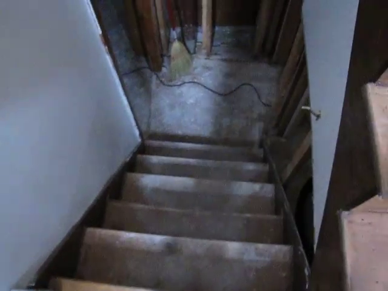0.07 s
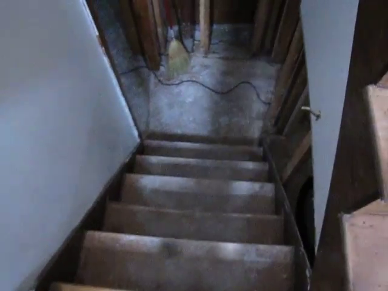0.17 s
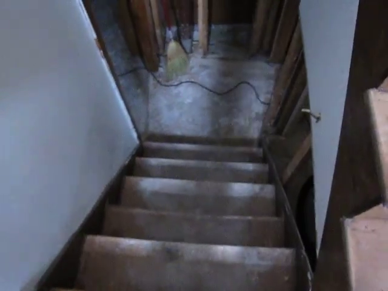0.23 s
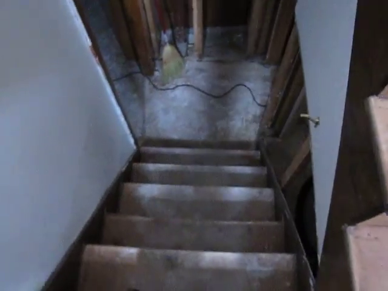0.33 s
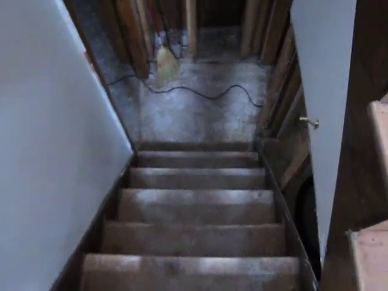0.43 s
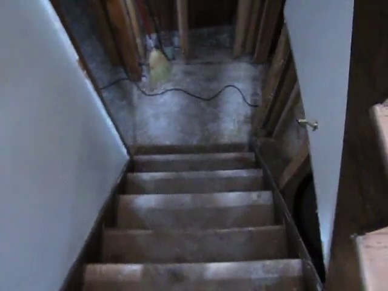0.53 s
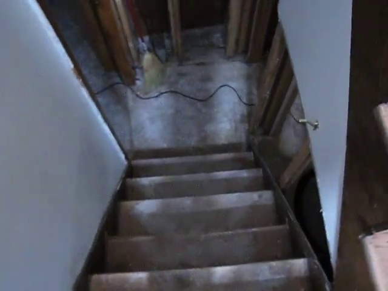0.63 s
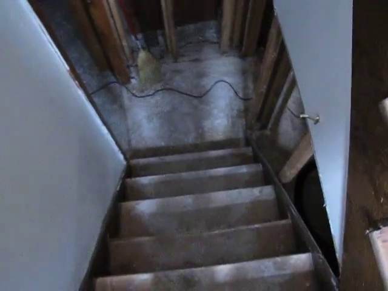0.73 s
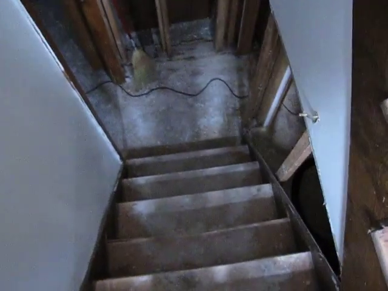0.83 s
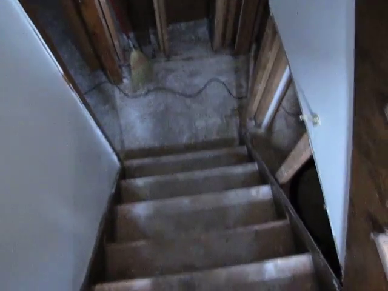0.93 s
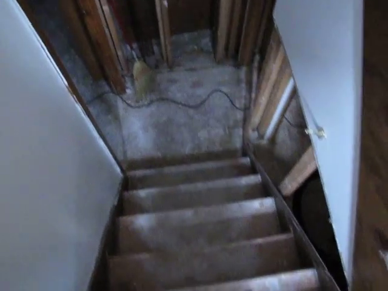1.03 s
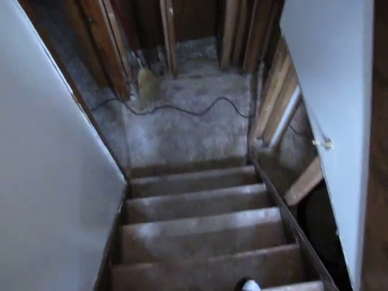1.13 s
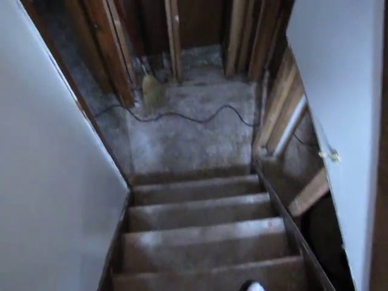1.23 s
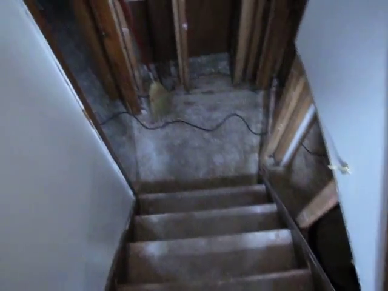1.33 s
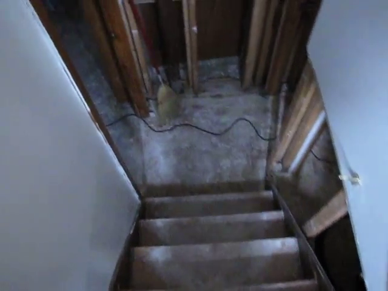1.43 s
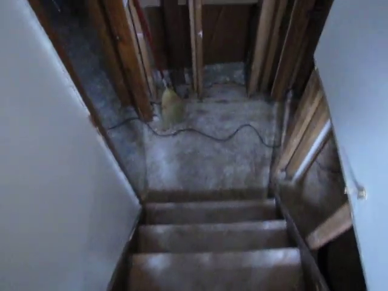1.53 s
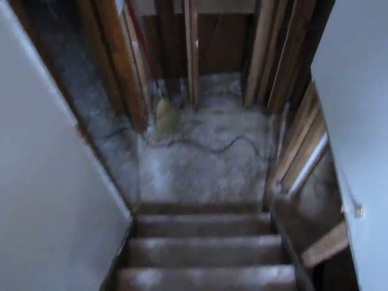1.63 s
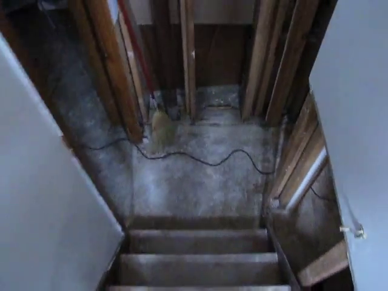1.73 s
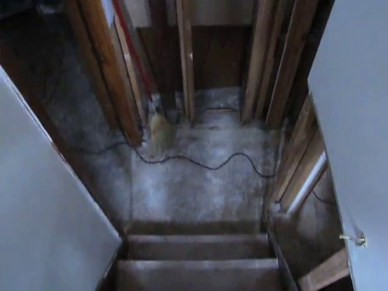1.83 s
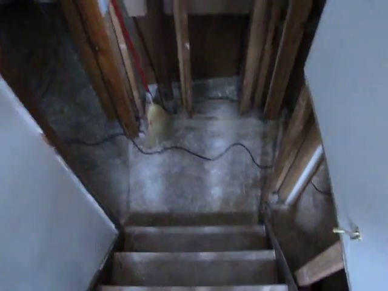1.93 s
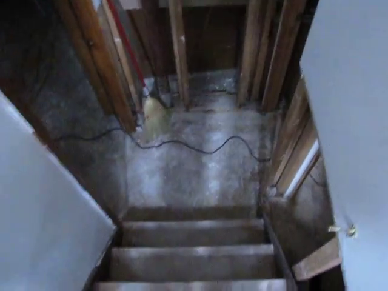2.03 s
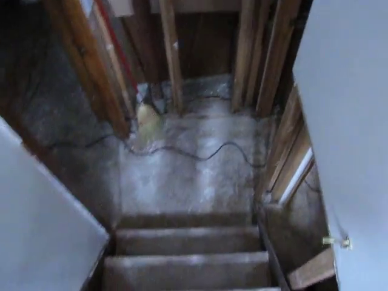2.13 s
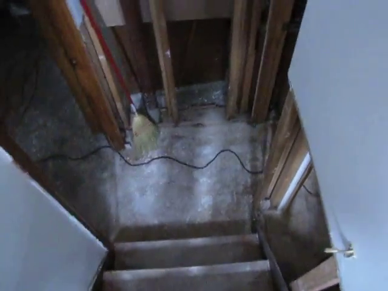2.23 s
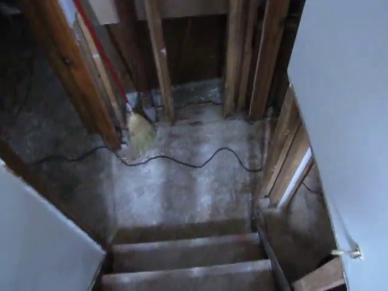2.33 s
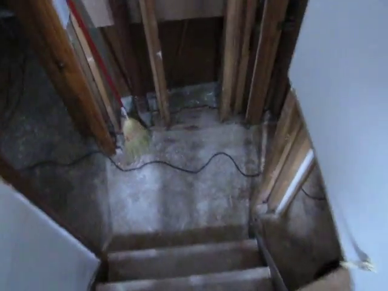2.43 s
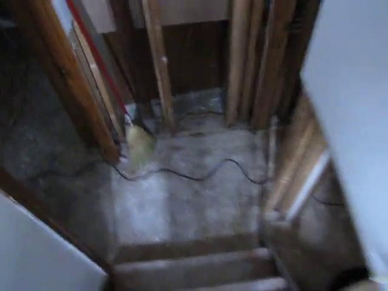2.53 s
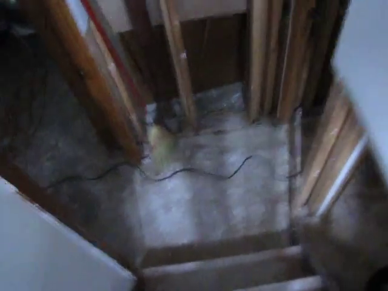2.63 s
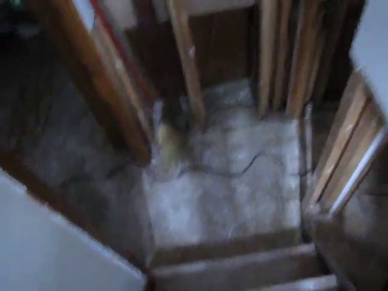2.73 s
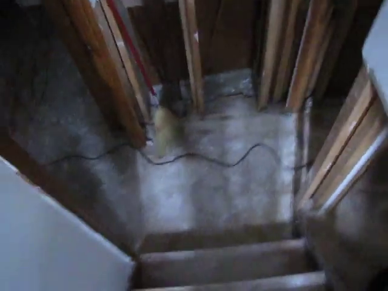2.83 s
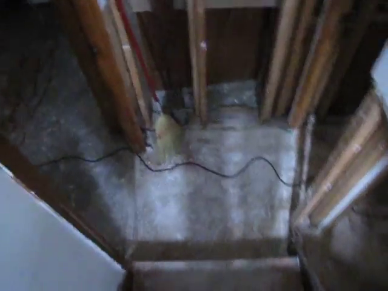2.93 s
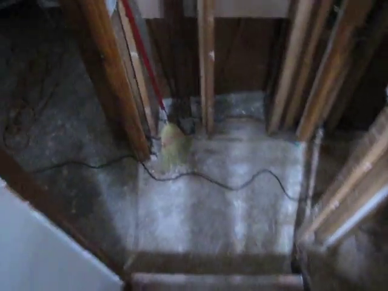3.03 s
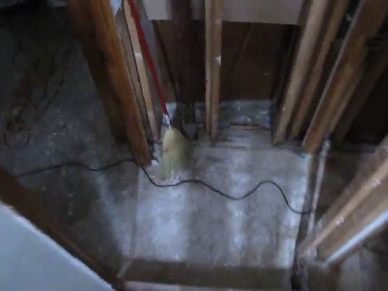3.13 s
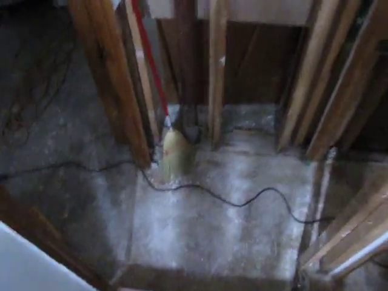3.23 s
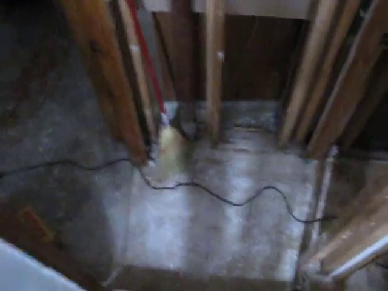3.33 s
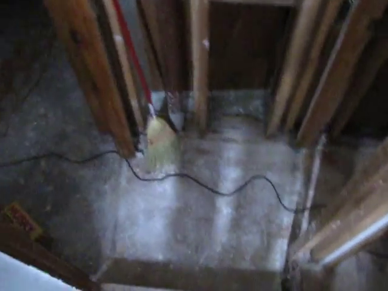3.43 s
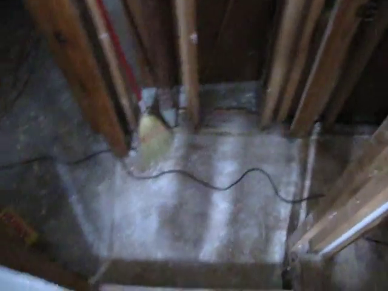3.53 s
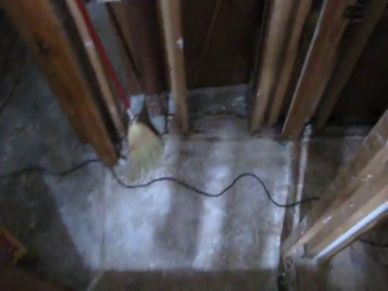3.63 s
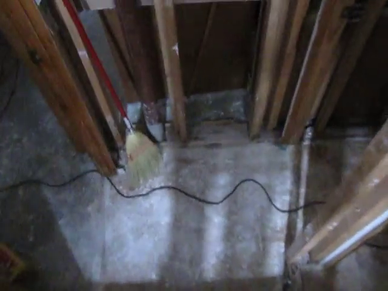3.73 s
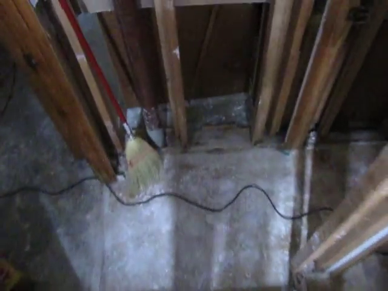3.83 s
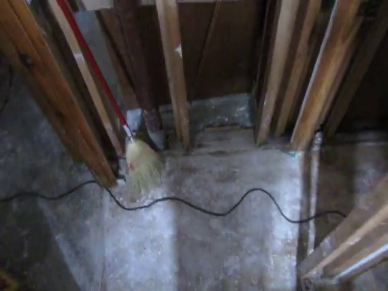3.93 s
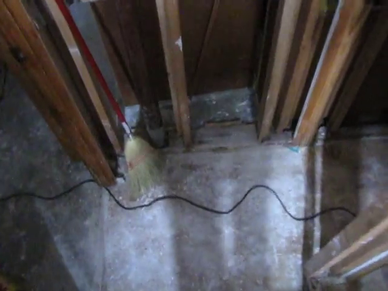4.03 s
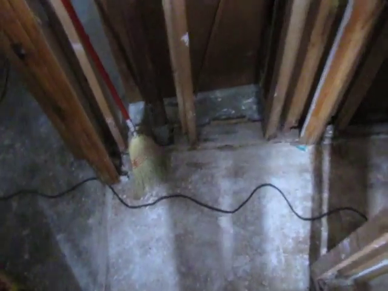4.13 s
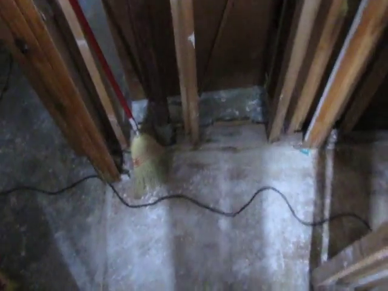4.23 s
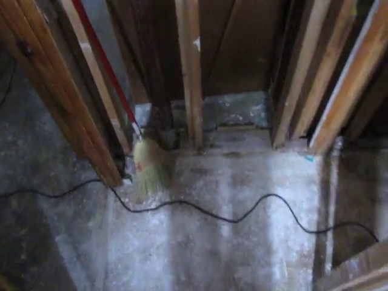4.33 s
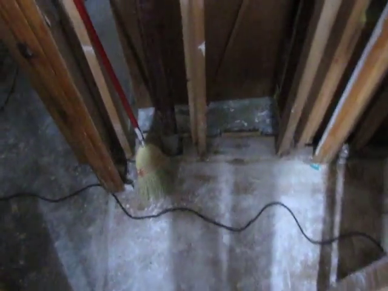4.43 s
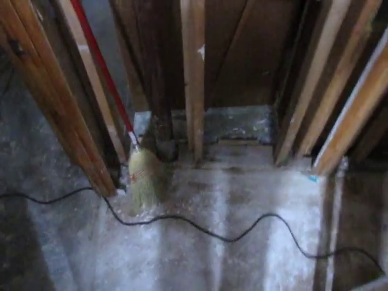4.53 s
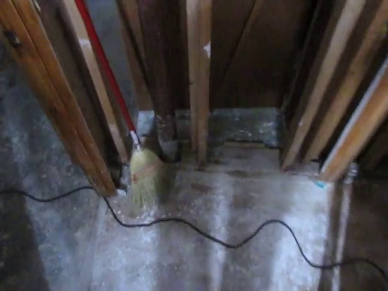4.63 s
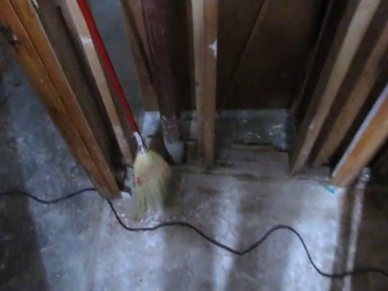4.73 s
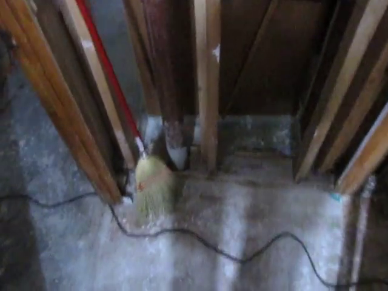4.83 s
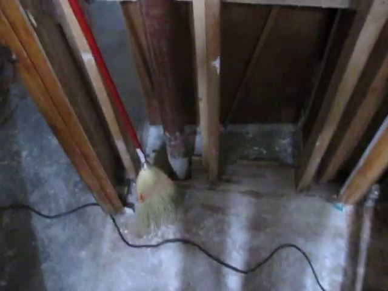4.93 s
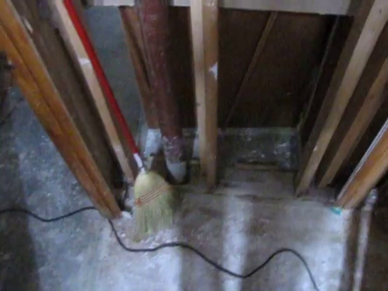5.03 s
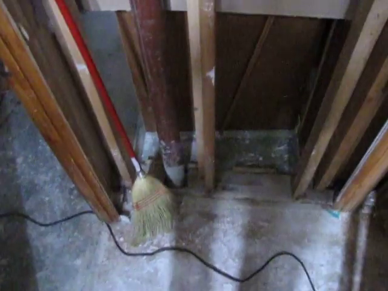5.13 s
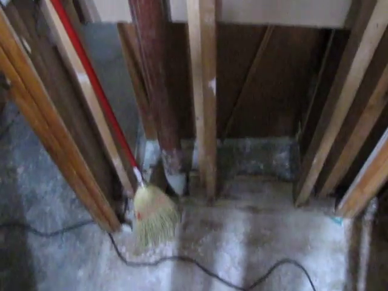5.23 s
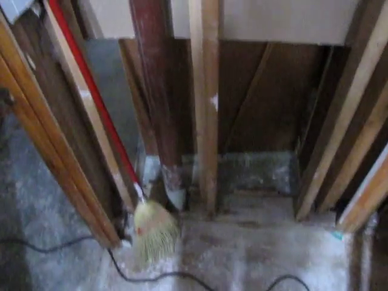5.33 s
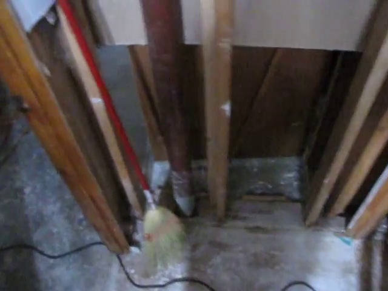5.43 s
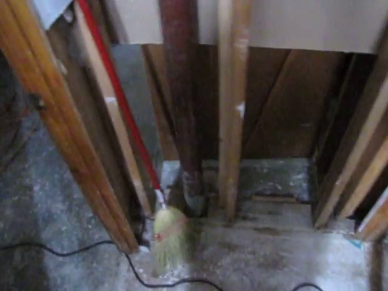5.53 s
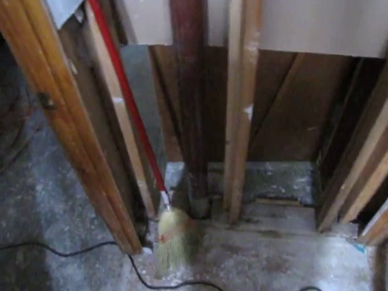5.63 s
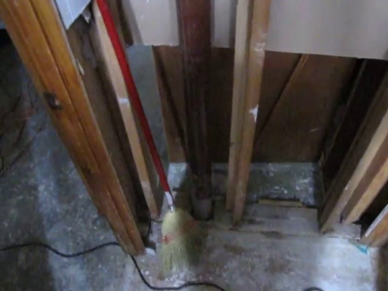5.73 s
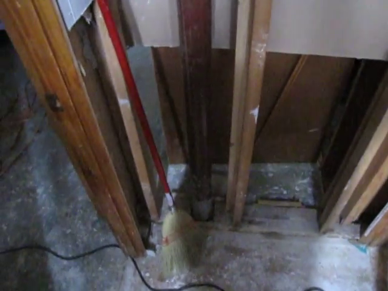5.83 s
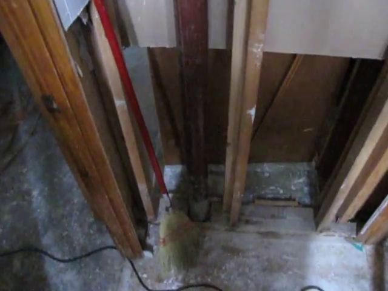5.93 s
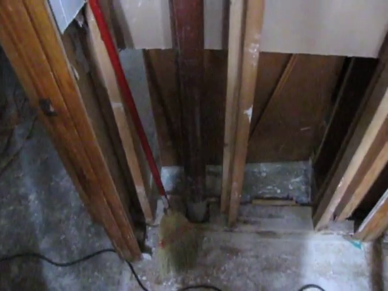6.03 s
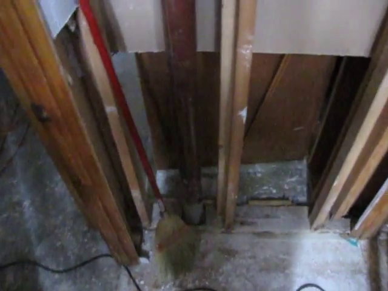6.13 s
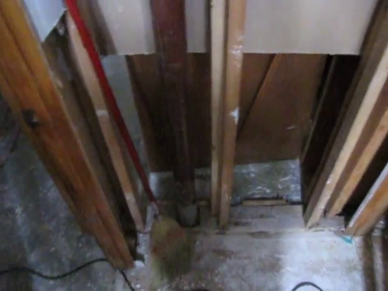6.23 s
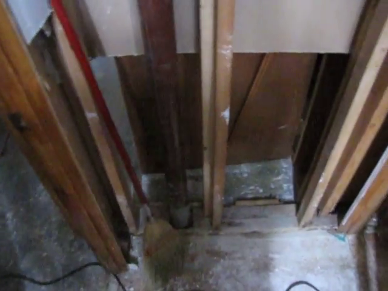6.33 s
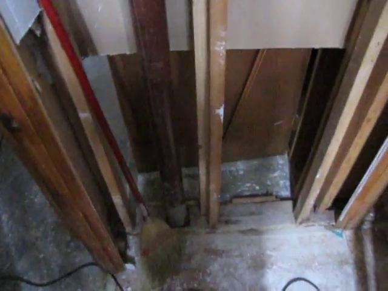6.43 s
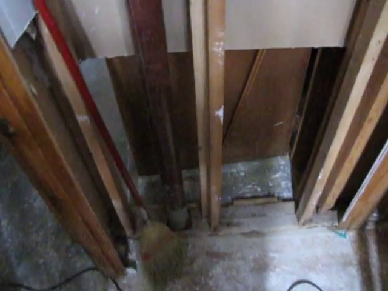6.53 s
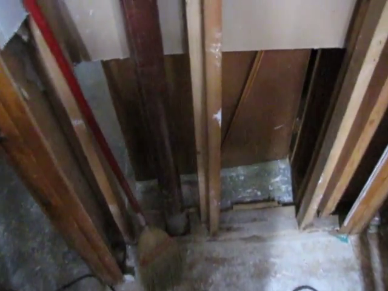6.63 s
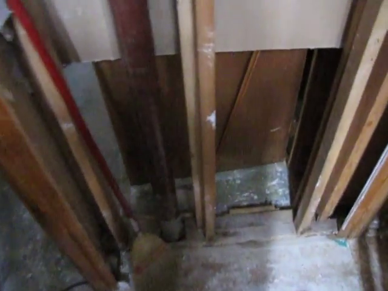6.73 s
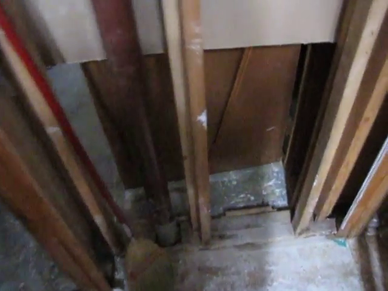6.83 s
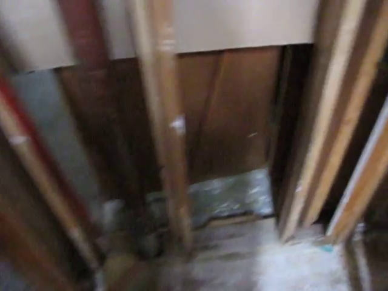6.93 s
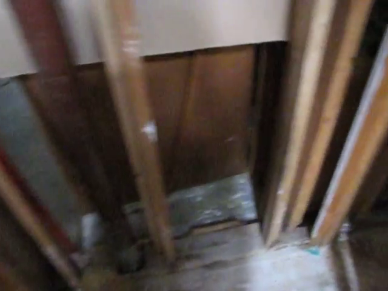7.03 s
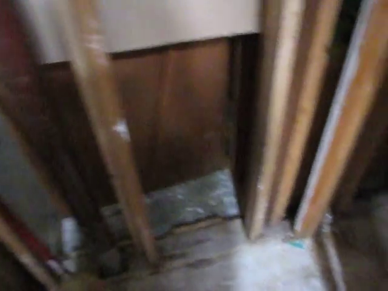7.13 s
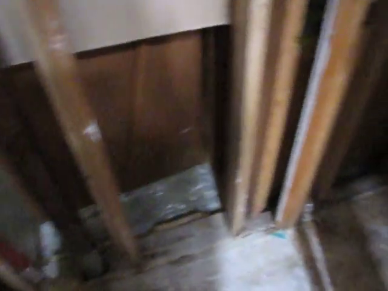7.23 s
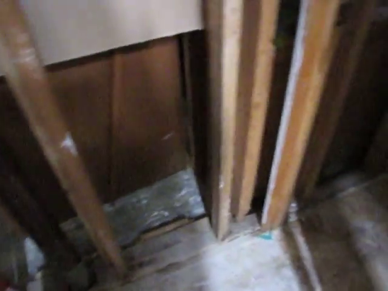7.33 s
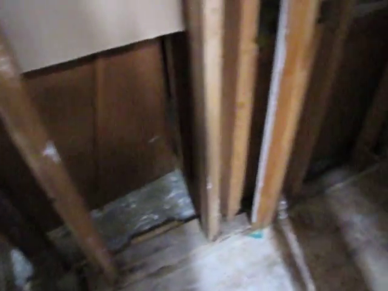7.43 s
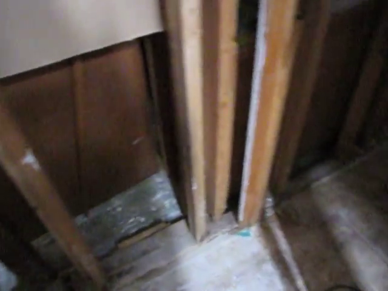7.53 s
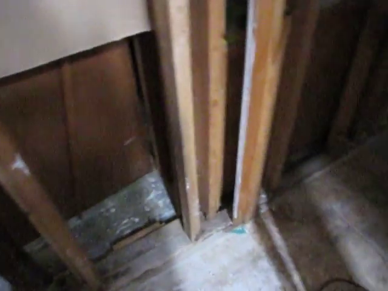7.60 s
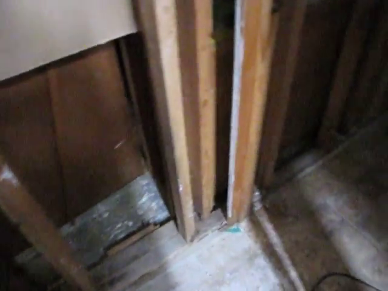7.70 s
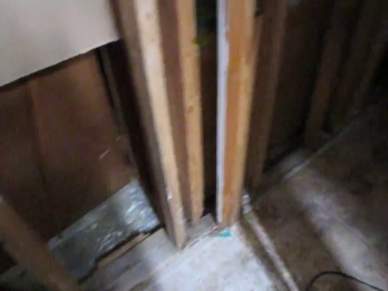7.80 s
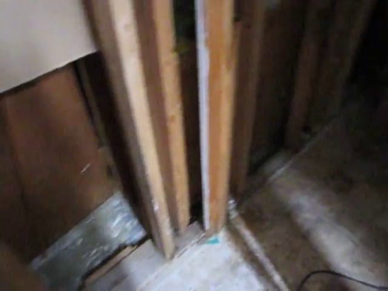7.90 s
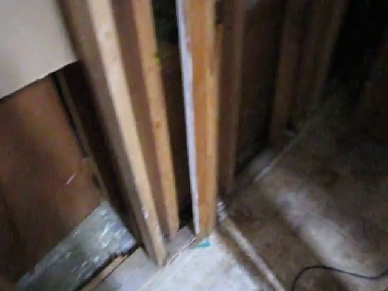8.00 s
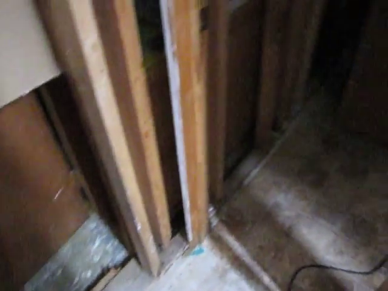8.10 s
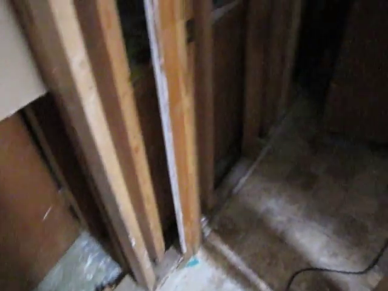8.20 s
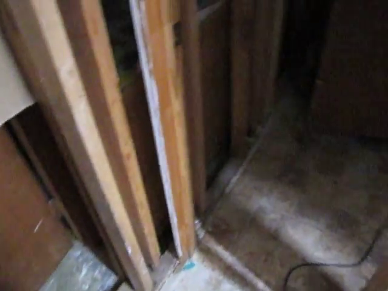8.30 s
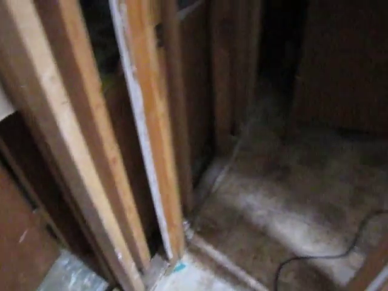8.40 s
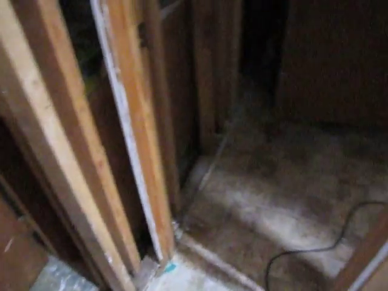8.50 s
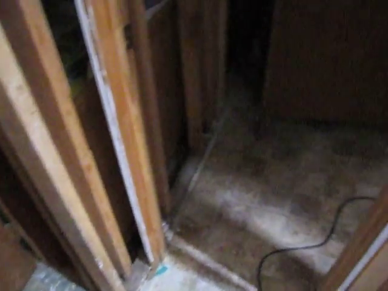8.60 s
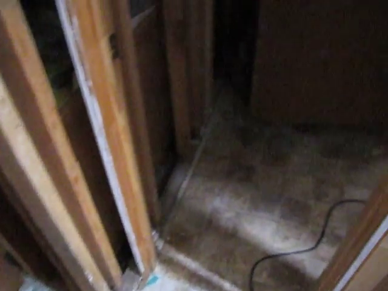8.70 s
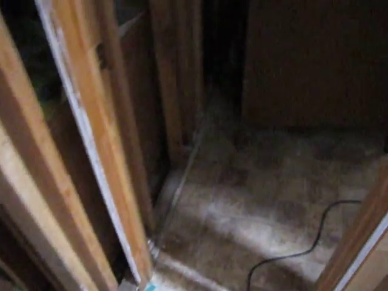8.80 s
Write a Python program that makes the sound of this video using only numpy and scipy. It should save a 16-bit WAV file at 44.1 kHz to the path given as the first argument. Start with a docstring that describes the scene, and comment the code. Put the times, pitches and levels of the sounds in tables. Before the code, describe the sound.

Someone walks down creaky wooden stairs, boards knocking and thudding hollowly, before quiet footsteps, a sole's twist and faint ticking on the basement floor.

```python
"""First a quiet hum and a swish of cloth, then shoes coming down an old wooden staircase, microphone in hand.
Each tread takes the weight with a run of stick-slip knocks; shoes clack and the whole flight booms under a heel.
At the foot, in a bare basement: a few soft steps, a pivoting sole, rustling clothes and small dry ticks.
Contacts are sprays of reflections plus a stairwell tail, filtered by wood or floor; cloth, sole and air are
coloured noise; hum and booms are sines."""
import sys
import numpy as np
from scipy import signal
from scipy.fft import rfft, irfft, next_fast_len
from scipy.io import wavfile

SR = 44100
rng = np.random.default_rng(int(sys.argv[2]) if len(sys.argv) > 2 else 0)


def unload_wav(signal):
    """Save mono or channel-first audio to the path in sys.argv[1] as 16-bit WAV at rate SR, clipped to [-1, 1]."""
    wavfile.write(
        sys.argv[1],
        SR,
        np.round(np.clip(np.atleast_2d(signal).T, -1, 1) * 32767).astype(np.int16),
    )


N = 390705
TIME = np.arange(N) / SR

# Still air of the house: f/Hz, relative level/dB
AIR_COLOUR = [(12, -35), (20, -8), (70, 1), (107, -8), (228, -17), (270, -14), (319, -13.5), (357, -16),
              (590, -19.5), (642, -19), (923, -20), (2260, -26.5), (2530, -28), (4810, -28.5), (16000, -43)]
# Side against mid in the air: f/Hz, side minus mid/dB
AIR_WIDTH = [(60, -13.5), (110, -8), (200, -2.5), (380, -8), (700, -1.5), (1290, -1.5), (2380, -2.5),
             (4400, 0), (8120, 0.5), (15000, 0)]
AIR_DB = -51.5  # rms of the mid
# Hum: f/Hz, rms level before the layer's trim/dB
HUM_TONES = [(64.6, -68), (226.1, -69), (382.2, -85.5)]

# Spectrum of rubbing cloth: f/Hz, relative level/dB
CLOTH_COLOUR = [(100, -15), (400, 15), (1500, 11), (3000, 11.5), (6000, 5.5), (10000, -1.5), (16000, -14)]
# Swishes with each swing of a leg or arm: peak t/s, peak level before the grain/dB, length/s
SWISHES = [(-0.003, -51, 0.16), (0.31, -42.5, 0.34), (0.66, -48, 1), (1.388, -53, .25), (1.77, -47.5, 0.67),
           (2.94, -56, .13), (3.262, -39, 0.27), (4.959, -39, 0.053), (6.95, -54.5, 0.97),
           (7.363, -48, 0.15), (8.379, -51.5, 0.41)]
SWISH_RISE_SHARE = 0.33  # part of the length spent swelling
RUB_DEPTH_DB = 25  # how far both ends of a swish or pivot lie below its peak
# Steady rustle on the way down, and the time constant of its dying away
WALK_RUSTLE_DB, WALK_END_S, SETTLE_S = -62, 5.34, 0.17

# Spectrum of a sole twisting on the floor: f/Hz, relative level/dB
PIVOT_COLOUR = [(71, -44), (120, -16), (168, -4), (269, -15), (362, 0), (550, -20), (588, -27), (629, -18),
                (1530, -23), (1680, -18.5), (3000, -36), (3900, -69), (6600, -120)]
PIVOT_PEAK_S, PIVOT_DB, PIVOT_LENGTH_S, PIVOT_RISE_SHARE = 7.27, -45, 0.87, 0.54

# Small ticks between the steps and while standing below: t/s, level before the layer's trim/dB, f/Hz
TICKS = [(0.577, -4, 8900), (0.651, -7, 6500), (2.945, -6, 2470), (4.251, -5.5, 1990), (6.627, -7, 1000),
         (6.699, -4.5, 1000), (7.911, -9, 2580), (7.945, -6, 2300), (8.003, -8, 2720), (8.196, -11.5, 5660),
         (8.385, -9, 850), (8.664, -0.5, 836), (8.745, -1.5, 840)]
# A faint, uneven patter of ticks near the end; level before the layer's trim, and values before scatter
PATTER_START_S, PATTER_GAP_S, PATTER_DB, PATTER_HZ = 8.11, 0.036, -4, 800

# The whole flight booming under the body's weight: t/s, peak level/dB, f/Hz
BOOMS = [(1.66, -17.5, 60), (2.48, -26.5, 72), (2.525, -21, 63), (2.651, -27, 66), (3.179, -14, 65.8),
         (3.309, -24.5, 69), (3.95, -26, 66), (4.667, -23.5, 73)]
BOOM_T60_S = 0.36

# Shoes meeting or leaving the floor:
# t/s, level before the layer's trim/dB, body re level/dB, edge re level/dB, strongest resonance f/Hz
CLACKS = [(0.2343, 11, 0, -1.5, 356), (0.312, 2.5, 6, -4, 210), (0.359, 0.5, 11.5, -3.5, 220),
          (1.392, 5.5, 7, -9, 403), (1.6236, 16, 12.5, -25, 292), (1.641, 9, 20, -19, 260),
          (1.664, 13, 8.5, -11.5, 260), (1.7195, 7, 10.5, -8.5, 337), (1.772, 5.5, 10, -9, 340),
          (1.795, 18.5, 4, -3.5, 384), (2.478, -0.5, 20.5, -11.5, 436), (2.518, 10.5, 11, -13, 430),
          (2.6202, 21, 4.5, -3.5, 1840), (2.675, 12, -4, -8.5, 182), (3.162, 18, 5, -9.5, 328),
          (3.187, 23.5, -1, -8, 610), (3.348, 11, 3, -9.5, 180), (3.727, 12, 4, -12, 387),
          (3.902, 25, 2.5, -7, 1690), (3.982, 9.5, 10.5, -6, 195), (3.9961, 21.5, -16, -9.5, 1000),
          (4.1, 8.5, 6.5, -14, 201), (4.1121, 3.5, 11.5, -0.5, 192), (4.356, 12, -2, -16, 338),
          (4.583, 4, 18.5, -15, 350), (4.592, 23, 0, -17, 340), (4.962, 3, -5, -4, 830),
          (5.267, -3, 25, -8.5, 395), (5.35, -10.5, 16, -1.5, 385), (6.033, -6.5, 5, -9.5, 396),
          (6.209, -7, 1.5, -8, 182), (6.811, 16.5, -1, -16, 382), (7.089, -18.5, 17, 2, 180),
          (7.368, -1.5, 1.5, -7.5, 1680), (7.381, -5.5, 4, -9, 308), (7.8055, -2.5, -5, 5, 2250)]
# Tone of a shoe on the surface: f/Hz, level/dB
CLACK_COLOUR = [(220, 0.5), (480, -2), (900, -1), (2100, 0.5), (2900, -1), (4800, -3.5), (6600, -4),
                (8000, -7.5), (12000, -4)]
# Snap of a sole on each tread, top to bottom, then on the floor: level/dB
SHOE_SNAP_DB = [0.5, -0.81, 1.5, 1.3, 0.73, -0.14]

# Boards slipping in their joints; a heavier slip has more body, a sharper one more edge:
# t/s, level before the layer's trim/dB, body re level/dB, edge re level/dB
KNOCKS = [(0.4279, 18.5, 9.5, -12), (0.463, 23.5, 2.5, -14.5), (0.4908, 14.5, 16, -2),
          (0.516, 15, 14.5, -19), (0.5432, 18, 3, -24), (0.58, 18, 8, -17), (0.7024, 23, 12, -8),
          (0.7239, 30, 0.5, -18.5), (0.769, 22, 5.5, -13), (0.9897, 24, 4.5, -10), (1.0462, 19.5, 9.5, -5),
          (1.1132, 23, 3, -6.5), (1.161, 22.5, 4.5, -9.5), (1.223, 21, 7, -8.5), (1.4157, 24.5, 5, -6),
          (1.489, 19.5, 6, -12), (1.521, 20, 6, -13.5), (1.5476, 21.5, 3.5, -14.5), (1.585, 14, 10.5, -17),
          (1.9521, 25, 2.5, -13.5), (2.1058, 22.5, 4, -13), (2.3047, 23.5, 3.5, -12),
          (2.526, 24.5, 5, -12.5), (3.14, 21.5, 7.5, -17), (3.309, 16, 12.5, -7.5), (3.37, 17.5, 3, -19),
          (3.412, 13, 7.5, -28), (3.525, 12.5, 5.5, -16), (3.836, 14.5, 10.5, -18.5), (3.967, 18, 4.5, -16),
          (4.379, 24, 4.5, -21), (4.596, 31, 1, -20), (4.626, 25.5, -5, -19.5), (4.654, 22, 4, -17),
          (4.669, 30, -5.5, -16), (4.688, 21.5, 5.5, -16), (4.707, 27.5, 4, -22), (4.741, 27, -4, -23),
          (4.764, 25, 0.5, -20.5), (4.8267, 28.5, -0.5, -18.5), (4.925, 27, 1.5, -15.5)]
# Tone of a slip deep in a joint, duller than a shoe: f/Hz, level/dB
KNOCK_COLOUR = [(220, 0.15), (480, -1.4), (900, -0.5), (1500, 0.5), (2800, 0), (5000, -8.5), (8000, -15)]
# What all knocks of one tread share, top to bottom:
# room level at the usual knock level, before the tail's lift/dB, attack length/s,
# strongest resonance f/Hz, snap of the highest treble/dB
TREAD_JOINTS = [(-8, 0.0082, 590, 4), (-6, 0.0047, 223, -5.5), (-6, 0.013, 438, 2),
                (-4.5, 0.012, 200, -1.5), (-7.5, .011, 355, 1.5)]

# Base spectrum of every shoe or board blow: f/Hz, level/dB
BLOW_BASE = [(25, -28), (40, -9), (60, -5), (90, -3), (140, -2.5), (220, -2), (1500, 1), (5000, 1.5),
             (8000, -2.5), (11500, -12.5), (16000, -23)]
# How much of a blow's body, edge and snap each frequency gets: f/Hz, share of the level in dB
BODY_SHARE = [(220, 0.94), (480, 0.79), (900, 0)]
EDGE_SHARE = [(900, 0.022), (2800, 1.07), (8000, 1.325)]
SNAP_SHARE = [(2800, 0), (8000, 0.67), (12000, 1.1)]
# Side against mid in blows and rubbing: f/Hz, side minus mid/dB
BLOW_WIDTH = [(100, -28), (250, -23.5), (500, -17), (1000, -12), (2000, -6), (4000, -0.5), (8000, -1.5),
              (14000, -3.5)]
# Left against right in blows: f/Hz, left minus right/dB
BLOW_BALANCE = [(100, -1.1), (1000, -0.4), (2000, -3), (4000, -1.7), (8000, -0.5)]

# Resonances of the treads, top to bottom: f/Hz, lift at full depth/dB
FIRST_TREAD = [(220, 9.5), (358, 4.5), (404, 7.5), (505, 11), (554, 4), (611, -2.5), (651, 3.5), (694, 6),
               (1121, -4), (1554, 2.5), (2576, 4)]
SECOND_TREAD = [(195, 2.2), (225, 6.8), (403, 7.3), (617, 8.3), (736, 8.1), (812, 7.3), (971, 6.3),
                (1305, 11.5), (1443, 12.3), (2462, 6.7), (2626, 7.5)]
THIRD_TREAD = [(159, 7.1), (196, 3.4), (378, 7.6), (426, 2.5), (593, 1.9), (758, 4.5), (902, 9.4),
               (1145, 11), (1284, 12), (1481, 8.5), (2292, 4)]
FOURTH_TREAD = [(179, 6.8), (349, 9.9), (433, 9.3), (625, 5.4), (690, 7.6), (1324, 5.5), (1419, 8.3),
                (1637, 5), (1806, 2.3), (2474, 3.1), (4231, 4.5)]
LAST_TREAD = [(202, 11.4), (239, 9.2), (347, 10.6), (463, 17.7), (516, 18.3), (917, 6.5), (1058, 4.6),
              (1129, 7.9), (1513, 1.2), (1963, 3), (2702, 2.9)]
# Resonances of the floor at the foot of the stairs: f/Hz, lift at full depth/dB
FOOT_OF_STAIRS = [(187, 14), (385, 7), (445, 7), (1130, 14), (1480, -8), (2500, 9)]
TREADS = [FIRST_TREAD, SECOND_TREAD, THIRD_TREAD, FOURTH_TREAD, LAST_TREAD, FOOT_OF_STAIRS]
# The weight moves on to the next tread, and at last to the floor: t/s
TREAD_CHANGES = [.93, 1.9, 3.0, 4.3, 5.15]
# How long the stairwell rings from each tread and the floor: t60 of the lows/s, t60 of the highs/s
TREAD_TAILS = [(0.46, 0.3), (0.5, 0.24), (0.54, 0.24), (0.51, 0.21), (0.4, 0.24), (0.49, 0.2)]

BLOW_SIZE = 16384  # samples
BLOW_T = np.arange(BLOW_SIZE) / SR
BLOW_HZ = np.fft.rfftfreq(BLOW_SIZE, 1 / SR)
BLOW_FADE = np.clip((BLOW_T[-1] - BLOW_T) / .08, 0, 1) ** 2  # over the last 80 ms
CUTOFF_HZ = 16000


def from_db(db):
    """Decibels to gain."""
    return 10 ** (np.asarray(db) / 20)


def at_hz(points, hz):
    """Read a (f/Hz, value) table on a log-frequency axis."""
    known_hz, values = np.transpose(points)
    return np.interp(np.log(np.maximum(hz, 1)), np.log(known_hz), values)


def unit_energy(x):
    """Scale each channel to energy 1."""
    return x / np.sqrt(np.sum(x ** 2, axis=-1, keepdims=True) + 1e-20)


def add(out, s, sound):
    """Mix a sound in at a time."""
    start = max(round(s * SR), 0)
    out[..., start:start + sound.shape[-1]] += sound[..., :N - start]


def stereo_noise(colour, width):
    """Noise of a given spectrum and stereo width; the mid has rms 1."""
    size = next_fast_len(N, real=True)
    hz = np.fft.rfftfreq(size, 1 / SR)
    shaped = rfft(rng.standard_normal((2, size))) * from_db(at_hz(colour, hz))
    mid = irfft(shaped[0], size)[:N]
    side = irfft(shaped[1] * from_db(at_hz(width, hz)), size)[:N]
    return np.array([mid + side, mid - side]) / mid.std()


def house(hum_db=-2):
    """Still air as wide coloured noise, with a faint hum of steady sines."""
    hum = np.zeros(N)
    for hz, db in HUM_TONES:
        phase = rng.random()  # in turns
        hum += from_db(db + hum_db) * np.sqrt(2) * np.sin(2 * np.pi * (hz * TIME + phase))
    return from_db(AIR_DB) * stereo_noise(AIR_COLOUR, AIR_WIDTH) + hum


def swell(peak_s, peak_db, length_s, rise_share):
    """Gain of a rubbing movement that speeds up to a peak and slows down again."""
    rise = np.clip(rise_share, .05, .95)
    # 0 at the peak, 1 at either end of the movement
    away = np.maximum((peak_s - TIME) / rise, (TIME - peak_s) / (1 - rise)) / length_s
    return from_db(peak_db - RUB_DEPTH_DB * np.minimum(away, 10))


def rubbing(gain, colour, grain_db, catches_per_s):
    """Friction noise that catches and lets go at random."""
    catches = rng.standard_normal(4000)
    grain = from_db(grain_db * np.interp(TIME * catches_per_s, np.arange(len(catches)), catches))
    return gain * grain * stereo_noise(colour, BLOW_WIDTH)


def clothes():
    """Cloth rubs faintly all the way down and swishes with each larger movement; powers add."""
    walking = from_db(WALK_RUSTLE_DB) * np.exp(-np.maximum(TIME - WALK_END_S, 0) / SETTLE_S)
    power = walking ** 2
    for s, peak_db, length_s in SWISHES:
        power += swell(s, peak_db, length_s, SWISH_RISE_SHARE) ** 2
    return rubbing(np.sqrt(power), CLOTH_COLOUR, grain_db=2.5, catches_per_s=270)


def sole():
    """One slow twist of a sole on the basement floor, as grainy friction noise."""
    gain = swell(PIVOT_PEAK_S, PIVOT_DB, PIVOT_LENGTH_S, PIVOT_RISE_SHARE)
    return rubbing(gain, PIVOT_COLOUR, grain_db=0.5, catches_per_s=95)


def broad_level(spectrum):
    """Magnitude of a blow's spectrum averaged over about half an octave."""
    bins, total = np.arange(len(spectrum)), np.cumsum(np.abs(spectrum) ** 2)
    reach = bins // 6 + 16
    low, high = np.maximum(bins - reach, 0), np.minimum(bins + reach, bins[-1])
    return np.sqrt((total[high] - total[low]) / (high - low) + 1e-20)


def causal(gain):
    """The minimum-phase filter with this gain: nothing sounds before the blow."""
    cepstrum = irfft(np.log(gain + 1e-9))
    cepstrum[1:BLOW_SIZE // 2] *= 2
    cepstrum[BLOW_SIZE // 2 + 1:] = 0
    return np.exp(rfft(cepstrum))


def reflections(per_s=1900):
    """Sparse arrivals from treads and close walls; mid and side."""
    return (rng.random(BLOW_SIZE) < per_s / SR) * rng.standard_normal((2, BLOW_SIZE))


def near_echoes(spread_s, direct, arrivals, wall_gain, wall_s=0.00683, wall_width_s=.0012):
    """The direct click, a quickly fading spray of reflections and a side-wall bounce; mid and side spectra."""
    bounce = wall_gain * np.exp(-((BLOW_T - wall_s) / wall_width_s) ** 2)
    spray = unit_energy(arrivals * (np.exp(-(BLOW_T / spread_s) ** 2) + bounce))
    spray[:, 0] += direct * np.array([1, rng.normal(0, 0.34)])
    return rfft(unit_energy(spray))


def stairwell_tail(low_t60, high_t60, split_hz=350, build_s=0.0047, soak_hz=7000, soak_db=-4.5):
    """Diffuse stairwell sound, lows and highs decaying apart, walls soaking up treble; mid and side spectra."""
    noise = rng.standard_normal((2, BLOW_SIZE)) * (1 - np.exp(-BLOW_T / build_s))
    low, high = (rfft(unit_energy(noise * from_db(-60 * BLOW_T / t60))) for t60 in (low_t60, high_t60))
    low_share = 1 / (1 + (BLOW_HZ / split_hz) ** 2)
    soaked = from_db(soak_db * BLOW_HZ ** 2 / (BLOW_HZ ** 2 + soak_hz ** 2))
    return soaked * (low_share * low + (1 - low_share) * high)


def blow(colour_db, ringing, room_db, spread_s, direct, arrivals, tail,
         wall_gain=0, tail_db=6.5, left_lag_s=.00003):
    """One contact at both ears: near echoes and tail, through the resonances and colour of what is struck."""
    mid, side = near_echoes(spread_s, direct, arrivals, wall_gain) + from_db(room_db + tail_db) * tail
    # flatten the broad spectrum first, so that the colour sets the level
    gain = causal(from_db(colour_db) * ringing / broad_level(mid * ringing))
    side = side * from_db(at_hz(BLOW_WIDTH, BLOW_HZ)) * broad_level(mid) / broad_level(side)
    lean = from_db(at_hz(BLOW_BALANCE, BLOW_HZ) / 2)
    later = np.exp(-2j * np.pi * BLOW_HZ * left_lag_s)
    left, right = (mid + side) * lean * later, (mid - side) / lean
    return BLOW_FADE * irfft(gain * np.array([left, right]))


def patter(count=8, scatter_db=2.0, jitter=.3, detune=0.036):
    """An uneven run of like ticks: (t/s, level/dB, f/Hz)."""
    run = []
    for k, (late, loud, high) in enumerate(rng.standard_normal((count, 3))):
        s = PATTER_START_S + PATTER_GAP_S * (k + jitter * late)
        run.append((s, PATTER_DB + scatter_db * loud, PATTER_HZ * (1 + detune * high)))
    return run


def ticks(sharpness=2.76, gain_db=-4.0):
    """Light, dry contacts close by, each with one broad resonance."""
    out, hz = np.zeros((2, N)), np.maximum(BLOW_HZ, 1)
    for s, level_db, pitch_hz in TICKS + patter():
        detune = hz / pitch_hz - pitch_hz / hz
        colour_db = gain_db + level_db - 10 * np.log10(1 + (sharpness * detune) ** 2)
        add(out, s, blow(colour_db, 1, room_db=-12, spread_s=0.0083, direct=0.7, arrivals=reflections(),
                         tail=stairwell_tail(*TREAD_TAILS[-1])))
    return out


def booms(press_s=0.0094):
    """The flight's lowest mode swells as the foot presses, then dies away."""
    out = np.zeros(N)
    envelope = (1 - np.exp(-(BLOW_T / press_s) ** 2)) * from_db(-60 * BLOW_T / BOOM_T60_S)
    envelope /= envelope.max()
    for s, peak_db, hz in BOOMS:
        add(out, s, from_db(peak_db) * envelope * np.sin(2 * np.pi * hz * BLOW_T))
    return out


def tread_ringing(modes, depth, width_hz=9, damping=0.023):
    """Gain of a tread's resonances; the higher ones are wider."""
    lifts = [db / (1 + ((BLOW_HZ - hz) / (width_hz + damping * hz)) ** 2) for hz, db in modes]
    return from_db(depth * np.max(lifts, axis=0))


def favoured_mode_db(hz, lift_db, sharpness=4.8, offset_db=-1.0):
    """Where a tread is struck decides which of its resonances speaks most."""
    detune = np.maximum(BLOW_HZ, 1) / hz - hz / np.maximum(BLOW_HZ, 1)
    return offset_db + lift_db / (1 + (sharpness * detune) ** 2)


def blend(usual, fresh, share):
    """Part of the sound takes the same way every time, the rest is new."""
    share = np.clip(share, 0, 1)
    return np.sqrt(share) * usual + np.sqrt(1 - share) * fresh


def stair_blows(blows, colour, direct, wall_gain, depth, favour_db, same_path):
    """Blows on the tread bearing the weight; those on one tread share part of their way through the stairwell."""
    out = np.zeros((2, N))
    base_db = at_hz(BLOW_BASE, BLOW_HZ) + at_hz(colour, BLOW_HZ)
    body, edge, snap = (at_hz(share, BLOW_HZ) for share in (BODY_SHARE, EDGE_SHARE, SNAP_SHARE))
    treads = [(tread_ringing(modes, depth), t60s, reflections(), stairwell_tail(*t60s))
              for modes, t60s in zip(TREADS, TREAD_TAILS)]
    for s, level_db, body_db, edge_db, room_db, spread_s, hz, snap_db in blows:
        ringing, t60s, usual_arrivals, usual_tail = treads[np.searchsorted(TREAD_CHANGES, s)]
        colour_db = level_db + base_db + favoured_mode_db(hz, favour_db)
        colour_db = colour_db + body_db * body + edge_db * edge + snap_db * snap
        arrivals = blend(usual_arrivals, reflections(), same_path)
        tail = blend(usual_tail, stairwell_tail(*t60s), same_path)
        add(out, s, blow(colour_db, ringing, room_db, spread_s, direct, arrivals, tail, wall_gain))
    return out


def shoes(gain_db=1.0, room_db=-5.0, drier_per_db=0.22, drier_per_edge_db=.2, spread_s=0.0087):
    """Shoes on boards and floor: a firm, sharp contact is one dry clack, a light or dull one trails off longer."""
    blows = []
    for s, level_db, body_db, edge_db, hz in CLACKS:
        snap_db = SHOE_SNAP_DB[np.searchsorted(TREAD_CHANGES, s)]
        clack_room_db = room_db - drier_per_db * level_db - drier_per_edge_db * edge_db
        blows.append((s, gain_db + level_db, body_db, edge_db, clack_room_db, spread_s, hz, snap_db))
    return stair_blows(blows, CLACK_COLOUR, direct=0.17, wall_gain=.75, depth=0.59, favour_db=7.0, same_path=0.44)


def boards(gain_db=-0.5, usual_db=22, drier_per_db=0.1):
    """Stick-slip knocks; the tread sets attack, room and strongest resonance, and a harder slip is drier."""
    blows = []
    for s, level_db, body_db, edge_db in KNOCKS:
        room_db, spread_s, hz, snap_db = TREAD_JOINTS[np.searchsorted(TREAD_CHANGES, s)]
        knock_room_db = room_db - drier_per_db * (level_db - usual_db)
        blows.append((s, gain_db + level_db, body_db, edge_db, knock_room_db, spread_s, hz, snap_db))
    return stair_blows(blows, KNOCK_COLOUR, direct=0.25, wall_gain=0.089, depth=0.85, favour_db=5.0, same_path=0.59)


def scene():
    """From the house air in the background to the stairs in front."""
    return house() + clothes() + sole() + ticks() + booms() + shoes() + boards()


def record(dry):
    """The highest peaks are rounded and the top is cut."""
    rounded = 1.1 * np.tanh(dry / 1.1)
    top_cut = signal.ellip(10, .1, 80, CUTOFF_HZ, fs=SR, output="sos")
    return signal.sosfilt(top_cut, rounded)


dry = scene()
out = record(dry)
unload_wav(out)
```